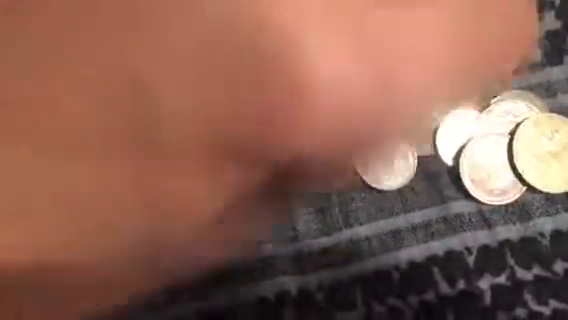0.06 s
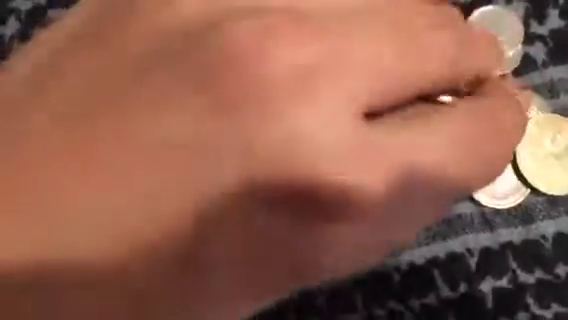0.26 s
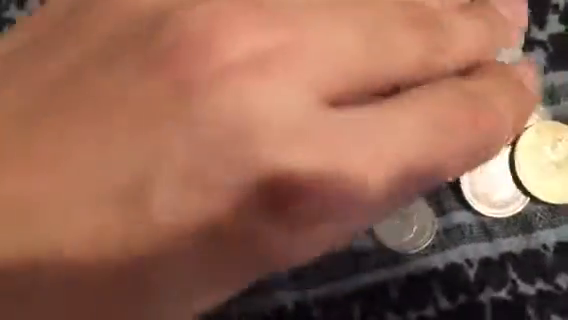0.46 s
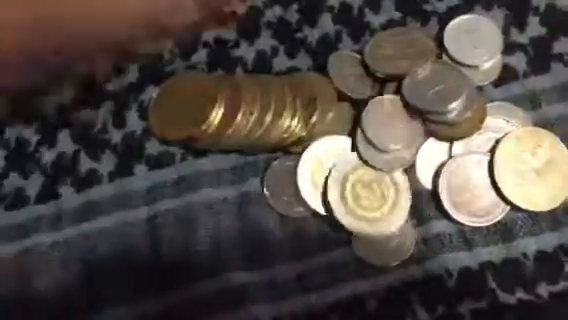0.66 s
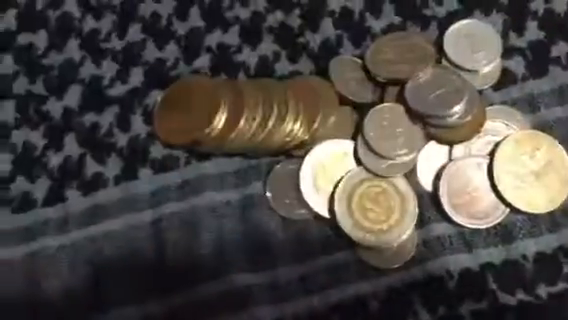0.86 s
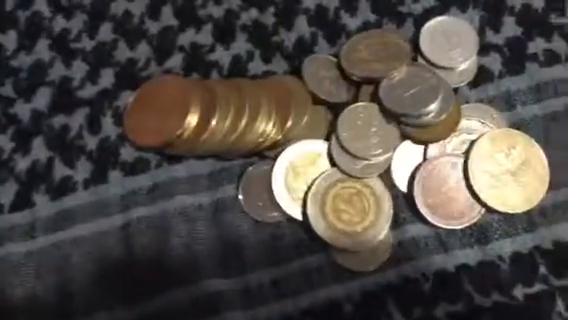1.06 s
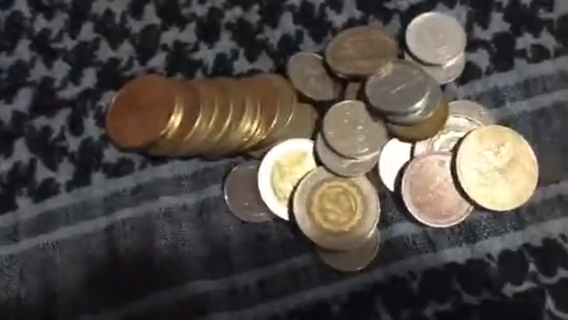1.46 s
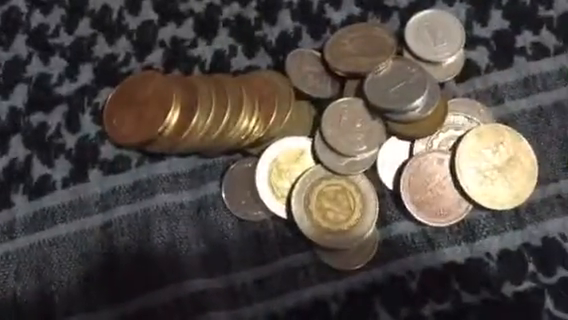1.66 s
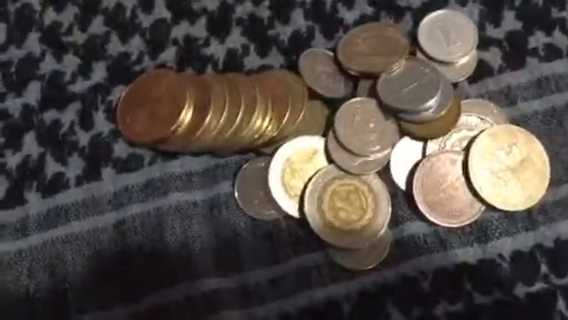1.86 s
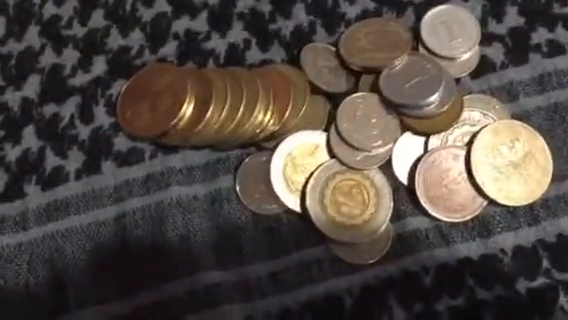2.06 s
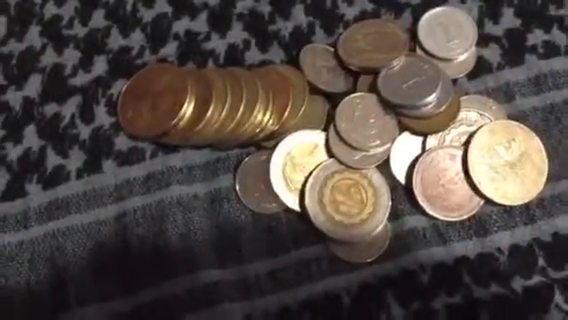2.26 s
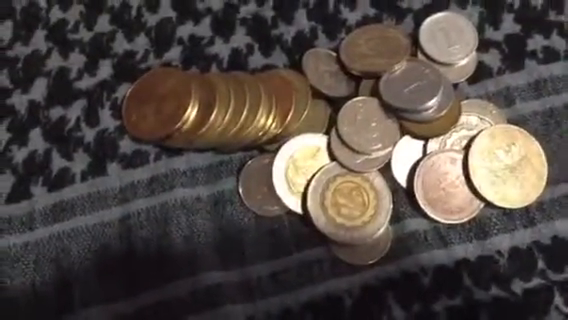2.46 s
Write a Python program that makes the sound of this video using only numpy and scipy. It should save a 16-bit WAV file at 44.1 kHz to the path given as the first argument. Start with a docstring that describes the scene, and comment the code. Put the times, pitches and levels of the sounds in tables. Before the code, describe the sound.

Coins clink onto a pile on cloth, settle, and give a few small late clinks.

```python
"""A small room hums faintly throughout. After a few light ticks, a hand drops coins onto a heap on a
cloth-covered table, close by. The first lands with a thud at 0.2 s; the rest clatter and settle by 0.9 s.
Most are damped by their neighbours and only clink, but a few ring freely. At about 1.55 s one coin tips
over and rattles to rest. Small ticks follow, and near 2.3 s a stack slips."""
import sys
import numpy as np
from scipy import signal
from scipy.fft import rfft, irfft
from scipy.io import wavfile

SR = 44100
rng = np.random.default_rng(int(sys.argv[2]) if len(sys.argv) > 2 else 0)


def put_to_file(sound):
    """Save the sound as 16-bit audio at rate SR, in the file named by the first command-line argument."""
    columns = np.atleast_2d(sound).T  # one column per channel
    safe = np.clip(columns, -1, 1)
    whole_steps = np.round(safe * 32767)
    wavfile.write(sys.argv[1], SR, whole_steps.astype(np.int16))


N = 110250  # 2.5 s


def amp(db):
    """Turns decibels into a factor to multiply by."""
    return 10 ** (np.asarray(db) / 20)


def unit(x):
    """Scales a sound so that its energy is 1."""
    return x / np.sqrt(np.sum(x ** 2) + 1e-20)


def read(points, hz):
    """Reads between the rows of a (frequency, value) table, with octaves evenly spaced."""
    f, value = np.transpose(points)
    return np.interp(np.log(hz + 1), np.log(f + 1), value)


def add(mix, start_s, sound):
    """Adds a sound to the mix at a given time."""
    part = mix[max(round(start_s * SR), 0):][:len(sound)]
    part += sound[:len(part)]


def colour(x, gain_db):
    """Turns each frequency up or down by gain_db(frequency), without smearing the sound earlier."""
    size = 2 * len(x)
    log_gain = np.log(amp(gain_db(abs(np.fft.fftfreq(size, 1 / SR)) + 1)) + 1e-6)
    response = np.exp(np.conj(signal.hilbert(log_gain)))
    return np.fft.ifft(np.fft.fft(x, size) * response).real[:len(x)]


def drift(rate_hz):
    """A slow random wander with a typical size of 1."""
    f = np.fft.rfftfreq(N, 1 / SR)
    return unit(irfft(rfft(rng.standard_normal(N)) * np.exp(-(f / rate_hz) ** 2), N)) * np.sqrt(N)


def hum(waver_hz=4.7):
    """The background: low room noise and wavering tones that swell and fade."""
    # colour of the room noise: (frequency [Hz], relative level [dB])
    air_colour = [(21, -37), (45, -8), (65, -10), (105, -0.5), (155, -17), (210, -8.5), (290, -12),
                  (360, -23.5), (750, -33), (1300, -32), (2000, -37), (4000, -39), (9000, -44),
                  (16000, -47)]
    # tones of the low and the upper hum: (pitch [Hz], level before the swell [dB])
    low_tones = [(97, -66), (113, -64.5), (128, -66.5), (175, -74)]
    upper_tones = [(226, -63), (285, -57.5)]
    # how the low hum, upper hum and deep rumble swell and fade: (time [s], gain [dB])
    low_swell = [(0, 0), (.2, 5.5), (.3, -9), (.47, -15), (.6, -4.5), (1.2, 3), (2, 0.5), (2.5, -8.5)]
    upper_swell = [(0, -15), (.29, -14.5), (.42, 2), (.6, 3), (.8, -5.5), (1.1, -1.5), (1.35, 2.5),
                   (1.52, -12.5), (2.5, -30)]
    rumble_swell = [(0, -69), (.12, -50), (.3, -96), (.58, -49.5), (.76, -52), (.85, -77), (1.15, -67),
                    (1.33, -55), (1.5, -62.5), (2.5, -62)]
    t = np.arange(N) / SR

    def tone(hz, db, waver):
        wobble = 1 + waver * (drift(waver_hz) + 1j * drift(waver_hz))
        return amp(db) * unit((wobble * np.exp(2j * np.pi * (hz * t + rng.random()))).real)

    def swell(points):
        return amp(np.interp(t, *np.transpose(points)))

    air_gain = amp(read(air_colour, np.fft.rfftfreq(N, 1 / SR)))
    air = irfft(rfft(rng.standard_normal(N)) * air_gain, N)
    low = sum(tone(hz, db, waver=.94) for hz, db in low_tones) * swell(low_swell)
    upper = sum(tone(hz, db, waver=.14) for hz, db in upper_tones) * swell(upper_swell)
    rumble = tone(hz=66.2, db=0, waver=.25) * swell(rumble_swell)
    return (amp(-58.5) * unit(air) + low + upper + rumble) * np.sqrt(N)


def heap_and_room(x, heap_db=-7.5, heap_fade_s=.045, tail_db=-14, size=20000):
    """The heap of coins rings briefly after each hit, then the sound dies away in the small room."""
    # how long the room echoes: (frequency [Hz], time to fade by 60 dB [s])
    fade_times = [(300, .2), (1000, 0.15), (2600, 0.51), (6500, 0.33), (12000, 0.22), (16000, 0.169)]
    t = np.arange(size) / SR
    sparse_noise = rng.standard_normal(size) * (rng.random(size) < 2000 / SR)
    heap_ring = sparse_noise * amp(-60 * t / heap_fade_s) * (t > .001)
    hz, times, spectra = signal.stft(rng.standard_normal(size) * (t > .006), SR, nperseg=256)
    tail = signal.istft(spectra * amp(-60 * times / read(fade_times, hz)[:, None]), SR)[1][:size]
    return signal.fftconvolve(x, amp(heap_db) * unit(heap_ring) + amp(tail_db) * unit(tail))[:N]


def rim_rattle(db=-46.5, fade_s=.38, contacts_per_s=2500, size=16384):
    """The tipped coin rattles to rest on its rim: many tiny contacts that die away smoothly."""
    # colour the coin gives the rattle: (frequency [Hz], relative level [dB])
    rim_colour = [(2000, -26), (4200, -13), (5300, -5), (6400, 8.5), (7600, -7), (9800, -2), (10800, 2),
                  (12000, -2), (14300, -18), (15500, -10)]
    t = np.arange(size) / SR
    contacts = rng.standard_normal(size) * (rng.random(size) < contacts_per_s / SR)
    rattle = unit(colour(contacts, lambda f: read(rim_colour, f))) * np.sqrt(size)
    return rattle * amp(db - 60 * t / fade_s)


def tick(db, hz, width_hz, decay_s=.0006, snap_db=-14, snap_hz=10500, size=1024):
    """Coin edges meet or slip: a bright snap and one ring that stops almost at once."""
    def body_db(f):
        peak = 1 + ((f / hz - hz / f) * hz / width_hz) ** 2
        low_cut = 1 + (.76 * hz / f) ** 10
        high_cut = 1 + (f / (hz + 4 * width_hz)) ** 4
        return -10 * np.log10(peak * low_cut * high_cut)

    burst = rng.standard_normal(size) * np.exp(-np.arange(size) / SR / decay_s)
    body = unit(colour(burst, body_db))
    snap = unit(colour(burst, lambda f: -10 * np.log10(1 + (snap_hz / f) ** 10)))
    return amp(db) * unit(body + amp(snap_db) * snap) * np.sqrt(2 * decay_s * SR)


def thud(db, first_hz, last_hz, decay_s, glide_s=.005, rise_s=.00026, size=8192):
    """The cloth and table give under a coin: a low note that slides from one pitch to another."""
    t = np.arange(size) / SR
    hz = last_hz + (first_hz - last_hz) * np.exp(-t / glide_s)
    loudness = amp(db) * (1 - np.exp(-t / rise_s)) * np.exp(-t / decay_s)
    return loudness * np.sin(2 * np.pi * np.cumsum(hz) / SR)


def ring(coin, db, rock_depth=.24, rock_s=.005, size=16384):
    """A coin that is free for a moment rings with its own tones, which waver as it rocks."""
    # each coin's tones, by name: (pitch [Hz], relative level [dB], time to fade by 60 dB [s])
    coin_tones = {"landing": [(5792, -17, .054), (9755, -4, .065), (12915, -5, .06), (13238, -2, .065),
                  (14908, -13, .09), (15255, -5, .09), (15590, -2, .08)], "tilted": [(11740, -13, .07),
                  (13110, 0, .055)], "small": [(13870, -27, .1), (14912, 0, .11)], "thin": [(9250, -8, .2),
                  (12298, 0, .35), (13280, -3, .15)], "broad": [(9182, -2, .13), (9326, -6, .14),
                  (10490, -4, .12), (11708, -2, .12), (15588, 0, .14)], "rolling": [(8204, -6, .2),
                  (12030, -9, .25), (13840, -5, .12), (14213, 0, .2)], "tipping": [(6503, -23, .18),
                  (10772, 0, .075), (10808, -14, .21), (15255, -14, .12), (15436, -22, .22)]}
    t, out = np.arange(size) / SR, np.zeros(size)
    for hz, tone_db, fade_s in coin_tones[coin]:
        rocking = signal.lfilter([1], [1, -np.exp(-1 / (rock_s * SR))], rng.standard_normal((2, size)))
        waver = 1 + rock_depth * np.sqrt(size) * (unit(rocking[0]) + 1j * unit(rocking[1]))
        tone = (waver * np.exp(2j * np.pi * (hz * t + rng.random()))).real
        out += amp(db + tone_db - 60 * t / fade_s) * tone
    return out


def clink(treble_db, middle_db, knock_db, chatter_s, size=2048, tone_count=180):
    """A coin hits the heap and chatters: each contact clicks and rings until neighbours damp it."""
    # colour of the heap: (frequency [Hz], gain [dB])
    heap_colour = [(120, -8.5), (400, 1), (900, 4.5), (1500, 4.5), (2100, 5), (3000, 5.5), (4500, 7.5),
                   (6000, 5), (7500, 3.5), (9000, 7.5), (10300, 1.5), (13000, 2.5), (14500, 2.5),
                   (15600, 1)]
    # centres of the three bands: (knock [Hz], middle [Hz], treble [Hz])
    band_hz = [1063, 6800, 11830]
    contacts_per_s, click_s = 1600, .00022
    lowest_hz, highest_hz, fade_s, ringing_db = 2551, 16380, .025, -2.5
    t = np.arange(size) / SR
    contacts = (rng.random(size) < contacts_per_s / SR) * (t < chatter_s) * rng.choice([-1, 1], size)
    contacts = contacts * amp(2.5 + 2 * rng.standard_normal(size))  # rebounds vary in strength
    contacts[0] = 1  # the first hit
    click_energy = signal.lfilter([1], [1, -np.exp(-2 / (click_s * SR))], contacts ** 2)
    clicks = rng.standard_normal(size) * np.sqrt(click_energy)
    # the heap lies differently each time, so each clink gets new pitches
    spread = (np.arange(tone_count) + rng.random(tone_count))[:, None] / tone_count
    hz = lowest_hz + (highest_hz - lowest_hz) * spread
    tones = np.sin(2 * np.pi * (hz * t + rng.random((tone_count, 1)))).sum(0) * amp(-60 * t / fade_s)
    ringing = signal.fftconvolve(contacts, tones)[:size]
    sound = unit(unit(clicks) + amp(ringing_db) * unit(ringing))
    bands = list(zip(band_hz, (knock_db, middle_db, treble_db)))
    coloured = colour(sound, lambda f: read(heap_colour, f) + read(bands, f))
    return coloured * np.sqrt((chatter_s + click_s) * SR)


def scene():
    """Places each sound in time and adds the heap's ringing and the room's echo and hum."""
    # coin hits coin: (time [s], treble gain [dB], middle gain [dB], knock gain [dB], chatter length [s])
    coin_hits = [(.154, -65, -62, -77.5, .028), (.183, -52, -53.5, -62, .008),
                 (0.2071, -14.5, -19, -21, 0.00012), (.2105, -23, -28, -51.5, 0.0074),
                 (.219, -28.5, -38.5, -59, .008), (0.2388, -24.5, -30.5, -42, 0.0018),
                 (0.2435, -23.5, -31, -48.5, 0.011), (0.258, -24, -34, -47.5, 0.0081),
                 (0.2684, -19, -25, -42.5, 0.0031), (0.2968, -30, -33, -46.5, 0.0053),
                 (0.3201, -32.5, -36.5, -46, 0.0013), (0.3263, -21, -32.5, -51.5, 0.0042),
                 (.334, -38, -34.5, -49.5, 0.0052), (0.348, -35, -41, -51, 0.0025),
                 (0.4105, -28, -33.5, -48, 0.0034), (0.422, -37.5, -43, -62, 0.015),
                 (0.445, -20, -40.5, -63, 0.00075), (0.4518, -23, -36, -63, 0.0024),
                 (0.4796, -30, -38.5, -60, 0.0065), (0.5027, -32, -30, -54, 0.0025),
                 (0.52, -29.5, -38, -62, 0.0037), (0.5245, -28.5, -36, -53, 0.0067),
                 (0.531, -30.5, -41.5, -58, 0.018), (0.5487, -21, -47.5, -45, 0.0075),
                 (.555, -23, -32, -39, 0.0029), (0.56, -33, -27, -57, 0.00096),
                 (0.577, -26.5, -36.5, -59, 0.0053), (0.6108, -27, -50.5, -77, 0.0038),
                 (0.617, -39, -43.5, -65.5, 0.014), (0.6826, -41, -38.5, -62, 0.0016),
                 (0.7018, -24, -32.5, -62, 0.01), (0.715, -17, -25.5, -38.5, 0.0043),
                 (0.7219, -16, -24, -54, 0.00083), (0.728, -32, -44.5, -46.5, 0.0086),
                 (0.742, -16.5, -29, -61, 0.0056), (0.7471, -19, -39, -37.5, 0.0018),
                 (0.7528, -21.5, -35, -53, 0.0061), (0.767, -32.5, -34, -65, 0.0034),
                 (0.791, -24.5, -28, -66, 0.00054), (0.796, -40, -38, -66, 0.0065),
                 (0.8073, -32, -43, -51, 0.00086), (0.8203, -40, -40, -75, 0.00084),
                 (1.5539, -33, -33, -49.5, 0.00054), (1.5579, -34, -44, -52, 0.0038),
                 (1.5628, -24, -39, -61, 0.0032), (1.5856, -35, -44.5, -93.5, 0.0039),
                 (1.658, -59, -54, -89, 0.016), (1.8422, -61.5, -59, -83, 0.0079),
                 (1.8844, -42, -49, -96.5, 0.0033), (2.006, -55, -54.5, -85.5, 0.0035),
                 (2.297, -45.5, -47.5, -67.5, 0.014), (2.317, -38.5, -38, -59, 0.011),
                 (2.328, -32, -43, -61.5, 0.013), (2.342, -51.5, -44, -65.5, 0.01)]
    # edges meet or slip: (time [s], level [dB], pitch [Hz], width of the pitch peak [Hz])
    edge_ticks = [(0.1272, -38.5, 6040, 690), (0.1271, -37, 11200, 3520), (0.15, -45, 7600, 2820),
                  (0.1707, -42.5, 6550, 2530), (0.186, -41, 7500, 3500), (0.2063, -8, 7090, 9300),
                  (0.2063, -28, 1040, 900), (.452, -30.5, 8500, 600), (0.5255, -23.5, 5760, 890),
                  (0.5557, -12, 12030, 1780), (.8395, -49, 12000, 4460), (0.8624, -37.5, 6310, 5030),
                  (1.554, -42, 1820, 980), (1.565, -32, 6650, 800), (1.828, -53, 8500, 4020),
                  (2.0106, -42, 7580, 1540), (2.0315, -48, 7220, 1264), (2.071, -43.5, 6880, 600),
                  (2.127, -50.5, 7160, 983), (2.1652, -55.5, 7870, 900), (2.2494, -52, 7420, 3000),
                  (2.289, -50, 9000, 4520), (2.331, -44, 2100, 400)]
    # coins ring freely: (time [s], coin name, level [dB])
    free_rings = [(0.209, "landing", -15), (0.327, "tilted", -23), (.446, "small", -16.5),
                  (0.556, "thin", -40), (0.713, "broad", -22.5), (.766, "rolling", -45.5),
                  (1.554, "tipping", -22.5)]
    # the padded table gives: (time [s], level [dB], first pitch [Hz], last pitch [Hz], decay time [s])
    table_thuds = [(0.2073, -13.5, 653, 268, 0.001), (0.2086, -14, 221, 44.4, .010),
                   (0.555, -39.5, 345, 198, 0.0047), (0.746, -39.5, 430, 137, 0.011),
                   (1.564, -34.5, 217, 172, 0.015), (2.298, -53, 186.4, 191.3, 0.046)]
    coins, ticks, rings, thuds = np.zeros((4, N))
    for start_s, *row in coin_hits:
        add(coins, start_s, clink(*row))
    add(coins, start_s=1.575, sound=rim_rattle())
    for start_s, *row in edge_ticks:
        add(ticks, start_s, tick(*row))
    for start_s, *row in free_rings:
        add(rings, start_s, ring(*row))
    for start_s, *row in table_thuds:
        add(thuds, start_s, thud(*row))
    lingering = heap_and_room(coins + amp(-7) * ticks)  # the light ticks linger more faintly
    return (coins + ticks + lingering + rings + thuds + hum())[None]


def record(dry):
    """Clips the sound at full scale and removes the very highest treble."""
    treble_cut = signal.firwin(401, 15950, window=("kaiser", 8), fs=SR)
    return signal.oaconvolve(np.clip(dry, -1, 1), treble_cut[None], "same")


dry = scene()
out = record(dry)
put_to_file(out)
```